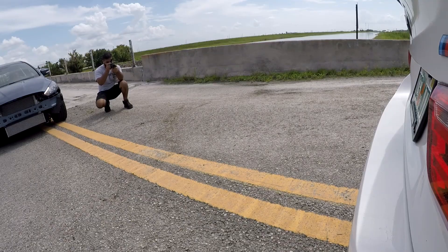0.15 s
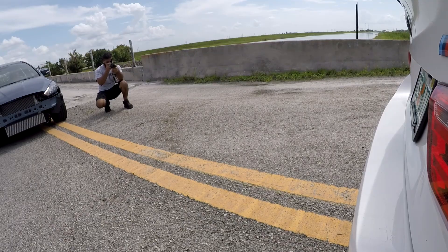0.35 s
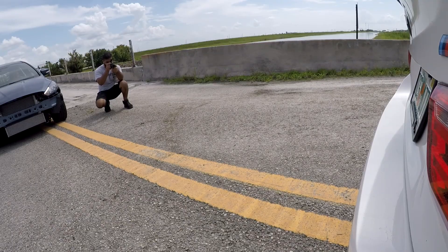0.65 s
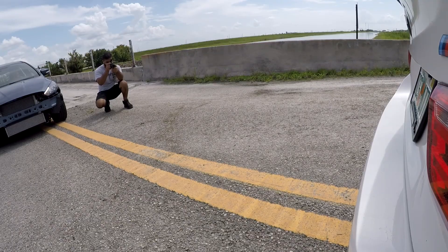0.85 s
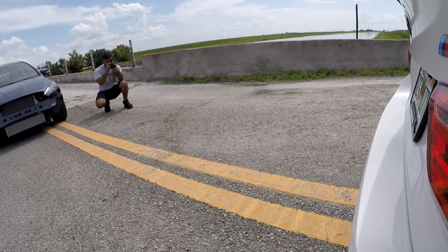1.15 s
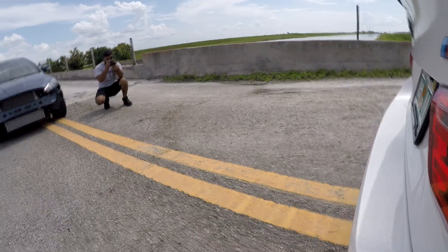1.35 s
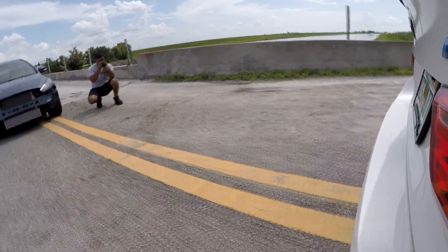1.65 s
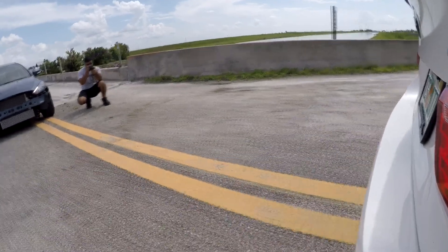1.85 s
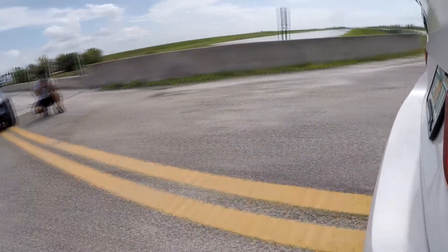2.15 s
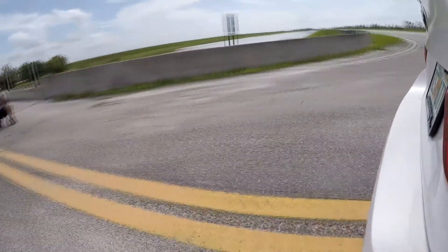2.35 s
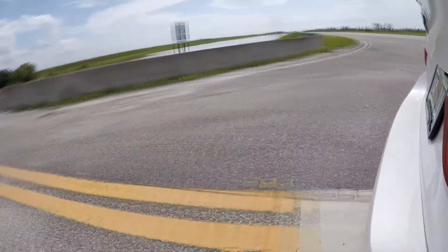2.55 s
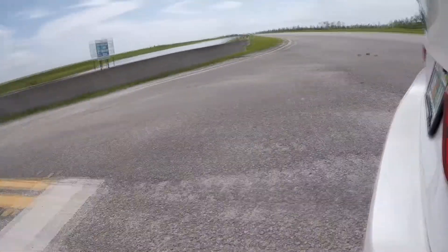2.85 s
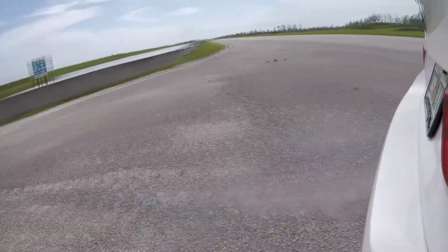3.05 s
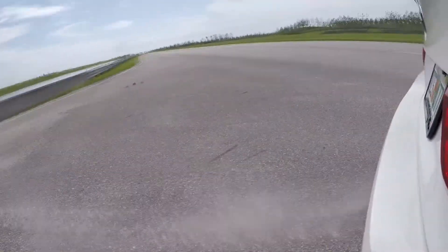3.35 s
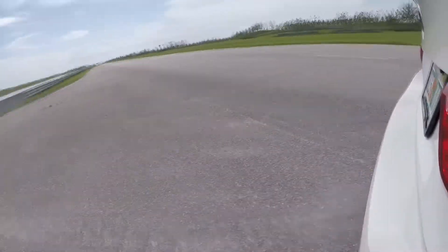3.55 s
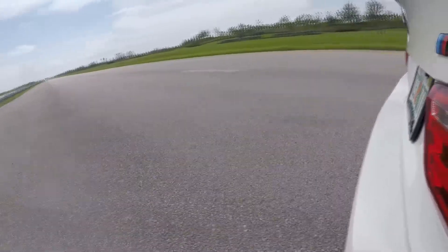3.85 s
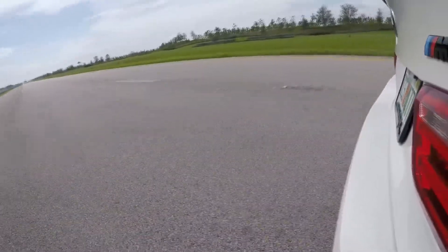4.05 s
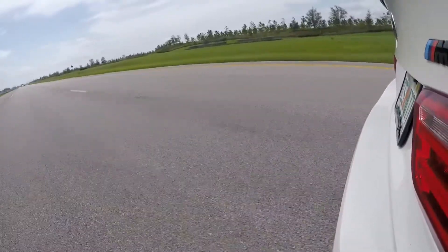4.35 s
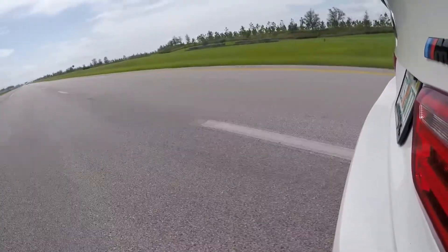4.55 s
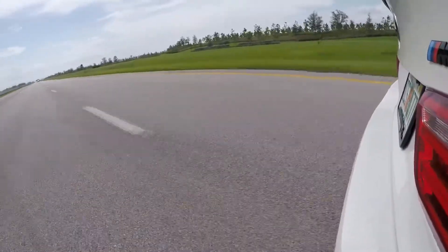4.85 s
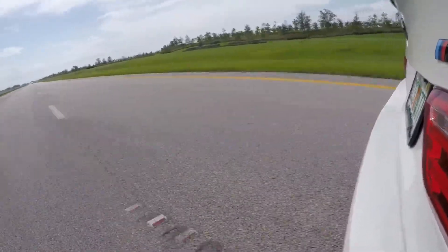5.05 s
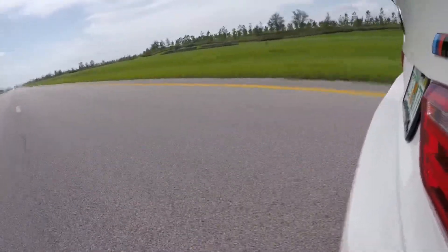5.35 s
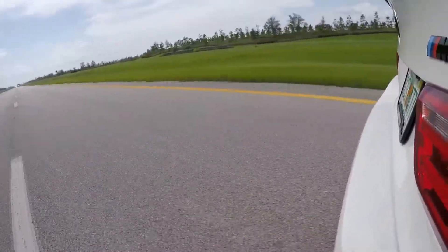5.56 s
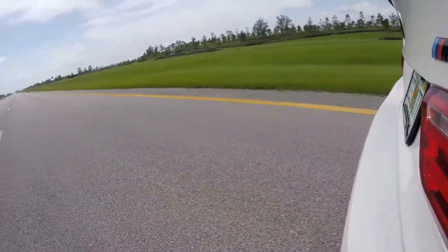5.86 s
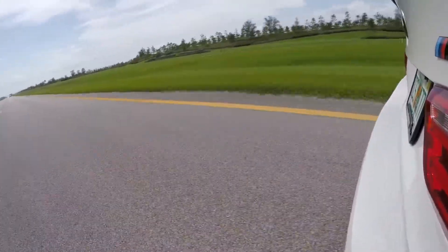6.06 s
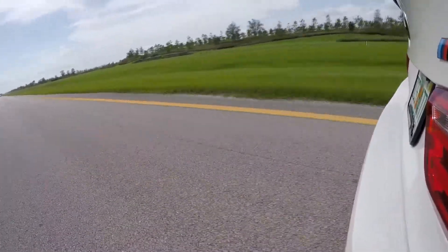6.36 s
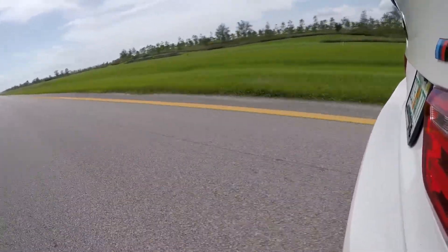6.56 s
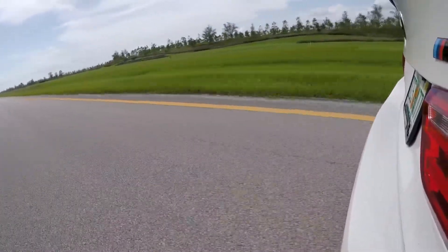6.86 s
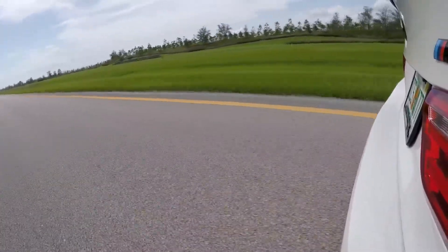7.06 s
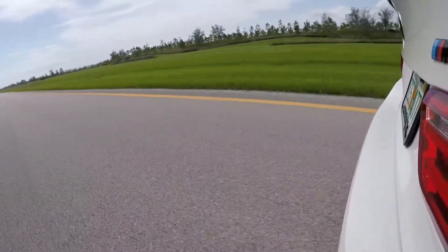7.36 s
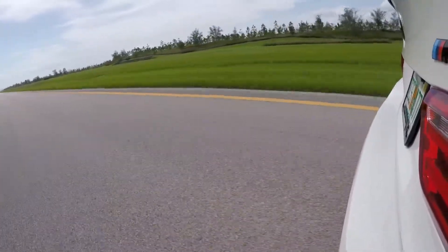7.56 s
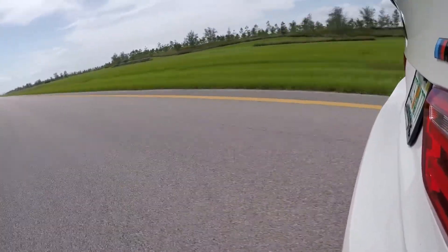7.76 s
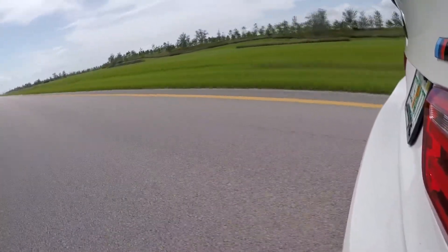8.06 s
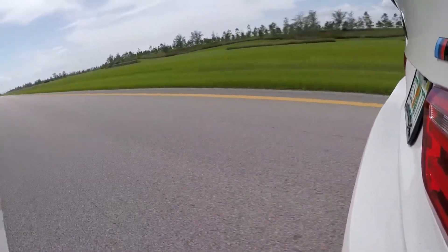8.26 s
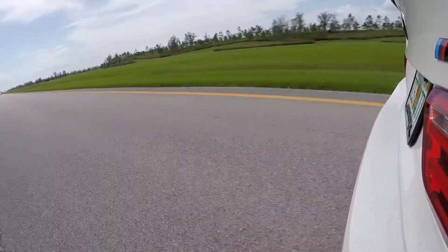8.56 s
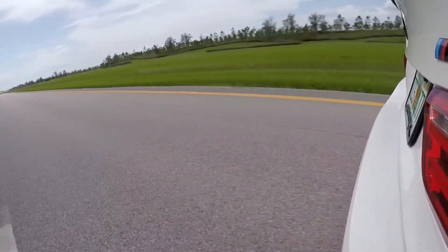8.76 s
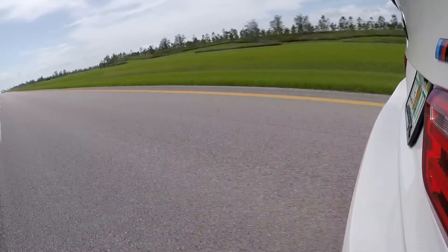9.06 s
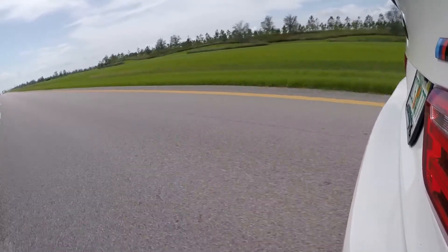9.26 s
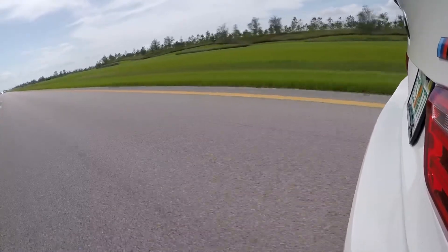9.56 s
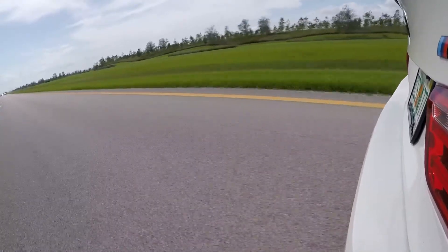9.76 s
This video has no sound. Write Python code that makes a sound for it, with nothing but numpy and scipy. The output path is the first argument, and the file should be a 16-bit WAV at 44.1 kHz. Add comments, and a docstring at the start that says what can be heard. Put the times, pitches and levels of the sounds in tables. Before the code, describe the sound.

Heard close at the tailpipes, an idling six-cylinder car revs up, rasps against its limiter, shifts with a bang and accelerates away amid crackles and wind.

```python
"""A turbocharged six-cylinder sports car, heard from its rear bumper just above the tailpipes.
Its idle is a putter of two pipe banks; from 1.2 s the revs rise, adding firing harmonics, rasp and gas hiss.
It launches against a limiter that cuts cylinders, then shifts with a bang: a noise burst with a sharp front.
It pulls away twice more; lifting brings pops, and after these two pulls faint wavering turbo whistles.
Under it all lies filtered noise for wind and tyres, stronger by the end."""
import sys
import numpy as np
from scipy import signal
from scipy.fft import rfft, irfft, next_fast_len
from scipy.io import wavfile
from scipy.ndimage import uniform_filter1d, minimum_filter1d

SR = 44100
rng = np.random.default_rng(int(sys.argv[2]) if len(sys.argv) > 2 else 0)


def bounce(signal):
    """Save signal as a 16-bit WAV file at the path given by the first command-line argument."""
    frames = np.transpose(np.atleast_2d(signal))
    limited = np.clip(frames, -1, 1)
    pcm = np.round(limited * 32767).astype(np.int16)
    wavfile.write(sys.argv[1], SR, pcm)


N = 437472

# Airstream at the microphone. Each row: time in seconds, level in dB.
WIND_LEVEL = [(0,-31),(1.2,-30),(1.5,-27),(2.2,-30),(5,-27.5),(5.8,-22),(6.2,-23.5),(6.6,-16.5),(7.2,-17),(7.7,-15.5),(8.8,-12),(9.5,-12.5),(9.92,-11)]
# Low buffeting spectrum. Each row: frequency in Hz, relative density in dB per Hz.
BUFFET_SPECTRUM = [(15, -56), (25, -11.5), (59, -1), (118, -2), (184, -3), (308, -10), (515, -20.5),
                   (576, -24), (653, -27.5), (700, -20.5), (910, -50.5), (1540, -120)]
# Tyres on asphalt. Each row: frequency in Hz, relative density in dB per Hz.
TYRE_SPECTRUM = [(500,-5),(950,3),(1500,-3),(2500,-12),(3500,-27.5),(6000,-59)]

# Turbo whistles as the throttle shuts. Each row: start in seconds, length in seconds, mid pitch in Hz,
# rate of random wavering in Hz, level in dB.
WHISTLES = [(7.61,0.086,6280,100,-47),(7.6,0.16,4770,160,-48),(7.69,.14,4100,90,-47),(7.6,0.2,4130,250,-49),(7.62,.2,2100,140,-40),(9.574,0.091,4450,200,-48),(9.571,0.034,6700,160,-48),(9.58,0.2,2900,1000,-44)]
WHISTLE_SAG_PER_S = 0.098   # share of the mid pitch lost per second
# Intake gulps as the throttle opens. Each row: centre in seconds, width in seconds, level in dB.
INTAKE_GULPS = [(1.72,0.97,-42.5),(6.424,0.25,-53),(8.5,0.21,-53)]
# Intake resonances, passed twice. Each row: frequency in Hz at full heat, width in Hz and level in dB per pass.
INTAKE_MODES = [(4284,670,3),(4570,360,9),(5820,1300,2.5)]
INTAKE_SAG = 0.24   # share of their pitch lost at zero heat
SPOOL_S, SPOOL_DB = 0.58, 18.5   # spooling time constant, and loss per unit of load not yet followed

SHUDDER_DB, SHUDDER_S = -19.5, 0.49   # the engine shudders as it leaves idle
SHUDDER_SWELL_DB = 0.5   # its note then rises briefly
# Small cracks in the pipe, leaving idle and off the throttle. Each row: time in seconds, level in dB.
KNOCKS = [(1.256,-24),(1.284,-29),(1.304,-36),(7.788,-25),(7.901,-30),(8.014,-35),(8.101,-35.5),(8.194,-37),(8.246,-36),(9.595,-28),(9.634,-36),(9.785,-31)]
# What they ring. Each row: frequency in Hz, width in Hz, relative level in dB.
KNOCK_MODES = [(1150,180,-1),(1750,360,0),(2140,230,-3),(2770,420,-9)]
KNOCK_DECAY_S = 0.0051
# Fuel exploding in the pipe. Each row: start in seconds, level in dB before colouring, decay in seconds.
POPS = [(1.207,-16,0.042),(2.352,-8.5,0.0075),(2.654,-5.5,0.0055),(2.85,-11.5,0.0071),(2.907,-14,0.0012),(3.034,-4.5,0.011),(3.292,-3,0.0075),(3.413,-8,0.0036),(3.475,-8.5,0.0059),(5.851,-16,0.016),(5.961,-0.5,0.0089),(6.165,-17.5,0.014),(7.552,-2,0.013),(7.82,-14.5,0.0048),(7.931,-17,0.013),(8.016,-21.5,0.002),(9.543,-5,0.008),(9.727,-12.5,0.0018)]
# Each row: frequency in Hz, gain in dB.
POP_SPECTRUM = [(40,-16),(150,11.5),(300,2.5),(520,-1.5),(1000,9.5),(1600,-10.5),(3000,-16),(6000,-20),(9000,-26),(15000,-59)]

# Pipe of the first bank of three cylinders at idle. Each row: frequency in Hz, width in Hz, level in dB.
FIRST_BANK = [(446,26,26),(676,81,27),(893,22.5,32),(846,93,22.5),(1000,167,17)]
# Pipe of the second bank. Each row: frequency in Hz, width in Hz, level in dB.
SECOND_BANK = [(420,12,16.5),(661,29,25.6),(706,184,20.9),(1010,78.4,32.63),(1013,46,34.3)]
SILENCER_ECHO_S, SILENCER_ECHO_SHARE = 0.00661, -0.39   # the pulse returns inverted from the silencer
TICK_DB, TICK_DECAY_S, TICK_WASH = -36, 0.0081, 0.18   # each firing spits a tick of gas over a faint wash
IDLE_LOPE_DB = -26.5   # the two banks differ, which puts weak lines between the firing harmonics

IDLE_HZ, FIRST_FIRING_S, REV_START_S = 49.65, .016, 1.2   # idle speed in firings per second
REV_HZ_PER_S, REV_GROWTH_HZ_PER_S2 = 88, 49   # the rev-up quickens
COAST_HZ_PER_S = 42   # added fall after the last driven row
HUNT_HZ = .5   # random wander of the speed at full cut
# Speed on the limiter. Each row: time in seconds, speed in firings per second.
LAUNCH_SPEED = [(2.2, 185), (2.27, 191), (2.45, 188), (2.62, 185.3), (2.82, 190.5), (3.01, 191.9),
                (3.11, 180), (3.14, 179.5), (3.21, 189), (3.3, 186.5), (3.42, 189), (3.56, 187),
                (3.66, 190.3), (3.9, 186), (4.2, 188.2), (4.4, 186.2), (4.72, 187.6), (4.87, 185.6),
                (5.05, 188.3), (5.3, 190.8), (5.47, 187), (5.57, 190.5), (5.66, 182), (5.75, 180),
                (5.93, 176)]
# Speed in each of the two gears. Each row: time in seconds, speed in firings per second.
GEAR_SPEEDS = [
    [(6.28, 163), (6.37, 150), (6.42, 138), (6.518, 116), (6.6, 110.8), (6.72, 114), (6.82, 120.3),
     (6.912, 128.6), (7.09, 141.3), (7.3, 152.6), (7.39, 153.7), (7.42, 150.7), (7.486, 137.7), (7.55, 145)],
    [(8.3, 94), (8.6, 98.3), (9.29, 113), (9.39, 114), (9.44, 108.5), (9.48, 108.5), (9.52, 114)],
]
# Throttle pulls. Each row: opening in seconds, rise in seconds, lift in seconds, fall in seconds, then the
# levels of deep note, rasp, jet hiss, sizzle and turbo in dB.
PULLS = [(1.511, 0.33, 5.606, 0.26, 3, -14.5, -26, -44, -44),
         (6.212, 0.22, 7.503, 0.19, -0.5, -16, -32, -52, -35),
         (8.24, 0.31, 9.54, 0.026, -2, -20, -38, -65.5, -47)]
# The five layers just off idle: deep note, rasp, jet hiss, sizzle and turbo in dB.
OFF_IDLE_DB = (-1, -23.5, -37, -55, -88)
# The five layers with the throttle shut: deep note, rasp, jet hiss, sizzle and turbo in dB.
OVERRUN_DB = (-23, -35, -64.5, -95, -77)
# Exponents by which the five layers follow the flow: deep note, rasp, jet hiss, sizzle and turbo.
FLOW_POWERS = (1.15, 0.54, 0.39, 1.2, 3)
LINGER_SHARE, LINGER_S = 0.67, 0.23   # part of the gas flow outlasts a lift, and its decay
HEATING_S, COOLING_S, FULL_HEAT = 0.12, 0.55, 0.9   # the gas heats under load and cools off the throttle
IDLE_TURBULENCE, LOAD_TURBULENCE, OVERRUN_TURBULENCE = 0.4, 0.55, .8
CATCH_S, CATCH_WIDTH_S, CATCH_TURBULENCE = 1.55, .7, .35   # the burn is ragged while the engine catches

# The limiter's cuts. Each row: start in seconds, length in seconds, depth from 0 to 1.
CUTS = [(2.295, 0.13, 0.47), (2.783, 0.26, 0.43), (3.479, 2.2, 0.94)]
CUT_RAMP_S = 0.15
# Ignition dropouts. Each row: centre in seconds, width in seconds.
MISFIRES = [(2.345,0.0072),(2.847,0.012),(2.926,0.0059),(3.028,0.008),(3.274,0.072),(3.414,0.011),(3.473,0.022)]
# Stretches of even burning in which one harmonic sings. Each row: start in seconds, length in seconds,
# multiple of the firing rate, level over the rasp in dB.
STEADY_BURNS = [(1.928,.29,5,-2),(2.457,0.12,5.3,-7),(3.061,0.15,5,-7.5),(3.59,0.16,6.1,-2.5),(4.161,0.18,6.1,-3),(4.434,0.096,4.6,-4.5),(4.821,0.21,4.6,-5.5),(5.174,0.21,6.1,-3.5),(5.413,.14,5.1,-5),(5.682,0.15,4.3,-1.5),(6.292,0.17,6.2,-7),(6.503,0.37,9,-5.5),(6.838,0.69,7.1,-3.5),(8.51,0.91,9.1,-4.5)]
LOCK_S, SINGING_WIDTH_HZ, SINGING_DUCK_DB = 0.078, 130, -3.5   # lock-in time; the rest of the rasp recedes
LIMITER_CALM, GEAR_CALM = .94, .72   # how far a steady burn evens out the firing, at full cut and in gear
# Exhaust flaring into crackle. Each row: centre in seconds, width in seconds, sizzle gain in dB.
FLARES = [(2.43, 0.19, 10.5), (2.89, 0.21, 11), (3.695, 0.18, 8), (5.16,0.28,4), (5.542, 0.44, 5.5),
          (6.688, 0.13, 12.5), (7.5, 0.13, 11.5), (9.468, 0.13, 18)]
FLARE_HISS_SHARE, FLARE_RASP_SHARE = 0.46, 0.23   # of that gain in dB
THROB_S, THROB_WIDTH_S, THROB_DB = 9.14, 0.62, 3   # in the last gear the gas throbs once a crank turn
CUT_RASP_DB = -0.7   # the rasp thins at full cut

# The six cylinders in firing order. Each row: strength in dB before the cut-dependent weight in firings(),
# lateness in firing intervals without a cut.
CYLINDERS = [(3,0.012),(2.5,0.00048),(4.5,0.0062),(1,0.013),(3.5,0.0037),(3,0.027)]
# The three firings of a crank turn at full cut. Each row: strength in dB, mean lateness in firing intervals.
CUT_PATTERN = [(4.5,0.0098),(2.5,0.4606),(-26.5,0.18)]
# Jet noise of hot gas. Each row: frequency in Hz, relative density in dB per Hz.
HOT_JET = [(1200,-2.5),(1800,4.5),(2150,-8.5),(2500,1.5),(3000,-6.5),(4500,-4.5),(5300,-9),(5900,-9),(7500,-22)]
# Jet noise of cool gas. Each row: frequency in Hz, relative density in dB per Hz.
COOL_JET = [(1200,11.5),(1600,1),(2300,-5.5),(2850,-13.5),(3300,-6),(3950,-3.5),(4600,-18),(5500,-7),(6500,-10.5),(7800,-21)]
# Fine crackle. Each row: frequency in Hz, relative density in dB per Hz.
SIZZLE_SPECTRUM = [(5500,-25),(7000,-5),(8500,-8),(10000,-19),(11700,-35.5),(13300,-19.5),(15000,-30.5)]
# Exhaust resonances at full heat. Each row: frequency in Hz, width in Hz, relative level in dB.
HOT_PIPE = [(471,49,-0.5),(635,88,3.5),(835,73,8.5),(939,100,11),(1037,137,10),(1230,96,8),(1520,110,-5.5),(1756,250,-8.5)]
PIPE_COOL_SAG, PIPE_WANDER = 0.18, 0.016   # share of their pitch lost at zero heat, and random wander
# Pulses from the far ends of the pipe. Each row: delay in seconds, share of the pulse.
ECHOES = [(.00455, 0.098), (.00685, 0.089)]
# How the pipe carries a firing harmonic. Each row: frequency in Hz, gain in dB.
PIPE_TONE = [(50,-18.5),(75,-27.5),(112,-39.5),(135,-23),(150,-11),(165,-13),(188,-9.5),(208,-12.5),(235,-14.5),(275,-10.5),(298,-20.5),(325,-11.5),(358,-18),(378,-25.5),(500,-25),(750,-47)]
# Firing harmonics from the first up. Each row: gain at idle in dB, revving cold in dB, at full heat in dB,
# change at full cut in dB.
HARMONICS = [(0, 2.5, -0.5, -3), (1, -1, -0.5, -14.5), (-6, -17.5, 3, -10), (-0.5, -13, -6, -4.5),
             (-23, -16.5, -2.5, -10), (-12.5, -15.5, -12, -2), (-23.5, -21, -18, -2.5), (-6, -15, -8.5, -1)]
# Crank orders that swell with the cut. Each row: cycles per turn, relative level in dB.
CUT_ORDERS = [(1,-29),(2,-43),(4,-22),(5,-24.5),(7,-37.5),(8,-42),(10,-26.5),(13,-46.5),(16,-40.5),(17,-39),(19,-25.5)]
# Irregular low noise of a partial cut. Each row: frequency in Hz, relative density in dB per Hz.
STUMBLE_SPECTRUM = [(30,-16),(60,-4.5),(110,-15),(170,-8),(260,7),(420,6),(600,-46)]
FIRINGS_PER_TURN = len(CYLINDERS) / 2

# At idle the left channel differs from the right. Each row: frequency in Hz, left minus right in dB.
CHANNEL_DIFFERENCE = [(60, -5.5), (110, 2), (190, -9.5), (330, -8.5), (570, -2.5), (1000, -15.5),
                      (1760, -12), (3100, -9.5), (5450, 9.5), (9570, 4)]
RELEASE_DB_PER_S = 118   # recovery of the recorder's limiter
STOPBAND_HZ = 16500   # 70 dB down from here up


def from_db(db):
    """Decibels are twenty times the logarithm of an amplitude gain."""
    return 10 ** (np.asarray(db) / 20)


def seconds():
    """Sampling divides time evenly."""
    return np.arange(N) / SR


def in_time(rows):
    """Linear interpolation gives each column of a curve at every sample."""
    s, *columns = np.transpose(rows)
    return [np.interp(seconds(), s, c) for c in columns]


def steady(x):
    """Automatic gain: division by the running 81 ms rms evens the slow level to 1."""
    return x / np.sqrt(np.abs(uniform_filter1d(x * x, size=3572)) + 1e-14)


def noise():
    """White noise has equal power at all frequencies."""
    return rng.standard_normal(N)


def colour(x, spectrum):
    """Minimum phase: a folded cepstrum makes a causal filter with the given spectrum."""
    size = 2 * next_fast_len(N // 2 + 8192)
    hz, db = np.transpose(spectrum)
    grid = np.log(np.arange(size // 2 + 1) * SR / size + 1)
    # skirts fall 30 dB in the octave beyond each end
    edges_hz = [hz[0] / 2, *hz, hz[-1] * 2]
    edges_db = [db[0] - 30, *db, db[-1] - 30]
    gain_db = np.interp(grid, np.log(edges_hz), edges_db)
    cepstrum = irfft(np.log(from_db(gain_db)))
    cepstrum[1:size // 2] *= 2
    cepstrum[size // 2 + 1:] = 0
    return irfft(rfft(x, size) * np.exp(rfft(cepstrum)))[:N]


def drift(rate):
    """Band-limited randomness: joined random knots, rate per second, wander with spread 1."""
    knots = rng.standard_normal(int(N / SR * rate) + 2)
    return np.interp(seconds() * rate, np.arange(len(knots)), knots) / np.sqrt(2 / 3)


def resonate(x, modes):
    """Modal superposition: two-pole resonances add in parallel with alternating sign."""
    out = np.zeros(N)
    for k, (hz, width, db) in enumerate(modes):
        r = np.exp(-np.pi * width / SR)
        poles = [1, -2 * r * np.cos(2 * np.pi * hz / SR), r * r]
        gain = (-1) ** k * from_db(db) * (1 - r * r) / 2
        out += gain * signal.lfilter([1, 0, -1], poles, x)
    return out


def detuned(x, modes, stretch):
    """Time scaling: resonating on a slowed clock lowers all pitches by a factor from 0.5 to 1."""
    clock = np.cumsum(np.clip(stretch, .5, 1))
    rung = resonate(np.interp(np.arange(N), clock, x), modes)
    return np.interp(clock, np.arange(N), rung)


def die_away(clicks, decay):
    """Exponential decay: each click starts a loss at a constant relative rate."""
    return signal.lfilter([1], [1, -np.exp(-1 / (decay * SR))], clicks + 1e-18)


def lag(x, time_s):
    """First-order relaxation follows a signal with the given time constant."""
    keep = np.exp(-1 / (time_s * SR))
    return signal.lfilter([1 - keep], [1, -keep], x + 1e-18)


def swell(s, width):
    """A Gaussian of height 1 around a moment, width wide at 1/e."""
    return np.exp(-(2 * (seconds() - s) / width) ** 2)


def gate(s, length, ramp):
    """A trapezoid from 0 to 1 whose edges stand at half height at start and end."""
    t = seconds()
    return np.clip(np.minimum(t - s, s + length - t) / ramp + .5, 0, 1)


def wind(gust_db=1.44, tyres_db=-19):
    """Flow noise: low buffeting and tyre rush share one level, a curve over time that is stronger by the end."""
    level_db, = in_time(WIND_LEVEL)
    buffet = from_db(gust_db * drift(30)) * steady(colour(noise(), BUFFET_SPECTRUM))
    tyres = from_db(tyres_db) * steady(colour(noise(), TYRE_SPECTRUM))
    return from_db(level_db) * (buffet + tyres)


def whistles():
    """Narrow-band modulation: vented boost air whistles waveringly and sinks as the turbo slows."""
    out = np.zeros(N)
    for s, length, hz, waver_hz, db in WHISTLES:
        age = np.clip(seconds() - s, 0, length)
        turn = 2 * np.pi * np.cumsum(hz * (1 - WHISTLE_SAG_PER_S * (age - length / 2))) / SR
        tone = drift(waver_hz) * np.cos(turn) + drift(waver_hz) * np.sin(turn)
        out += from_db(db) * np.sin(np.pi * age / length) * tone
    return out


def turbo(full_db, load, heat):
    """Cavity resonance: intake air hisses, gulps as throttle opens, gains as spool follows, rises with heat."""
    gulps = sum(from_db(db) * swell(s, width) for s, width, db in INTAKE_GULPS)
    unspooled = np.maximum(load - lag(load, SPOOL_S), 0)
    boost = from_db(full_db - SPOOL_DB * unspooled)
    stretch = 1 - INTAKE_SAG * (1 - heat) ** 4
    air = detuned(detuned(noise(), INTAKE_MODES, stretch), INTAKE_MODES, stretch)
    return (gulps + boost) * from_db(1.5 * drift(25)) * steady(air)


def shudder():
    """Random vibration: a short low rumble as the engine picks up from idle."""
    return from_db(SHUDDER_DB) * swell(REV_START_S, SHUDDER_S) * steady(colour(noise(), BUFFET_SPECTRUM))


def knocks():
    """Modal ringing: brief gritty cracks sound the metal of the pipe."""
    s, db = np.transpose(KNOCKS)
    hits = np.zeros(N)
    hits[(s * SR).astype(int)] = from_db(db)
    return die_away(hits, KNOCK_DECAY_S) * steady(resonate(noise(), KNOCK_MODES))


def pops(front=5.4, steep_from_db=-6):
    """Wave steepening: each pop is a short roar, and a stronger one has a sharper front."""
    bursts = np.zeros(N)
    age = np.arange(4096) / SR
    for s, db, decay in POPS:
        burst = rng.standard_normal(len(age)) * np.exp(-age / decay)
        burst[0] += front
        edge_hz = np.clip(6000 * from_db(db - steep_from_db), 1500, 14000)
        burst = signal.sosfilt(signal.butter(1, edge_hz, fs=SR, output="sos"), burst)
        at = int(s * SR)
        bursts[at:at + len(age)] += from_db(db) * burst
    return from_db(5.5) * colour(bursts, POP_SPECTRUM)


def idle_lope(phase):
    """Subharmonics: the limp of the idle sounds halfway between the low firing harmonics."""
    lines = sum(np.sin(2 * np.pi * (k + .5) * phase + k * k) for k in range(2, 8))
    return from_db(IDLE_LOPE_DB) * lines / 2


def putter(phase, scatter_db=2.1):
    """Impulse excitation: two banks fire in turn, each knocking its own pipe with a crisp tick of gas."""
    number = np.floor(phase)
    clicks = np.diff(number, prepend=number[0]) * from_db(scatter_db * drift(54))
    second = number % 2
    pipes = resonate(clicks * (1 - second), FIRST_BANK) + resonate(clicks * second, SECOND_BANK)
    pipes = pipes + SILENCER_ECHO_SHARE * np.interp(seconds() - SILENCER_ECHO_S, seconds(), pipes)
    ticks = (die_away(clicks, TICK_DECAY_S) + TICK_WASH) * noise()
    return pipes + from_db(TICK_DB) * steady(colour(ticks, COOL_JET))


def limiter():
    """Speed limiting: the depth from 0 to 1 of the cylinder cut."""
    return np.clip(sum(depth * gate(s, length, CUT_RAMP_S) for s, length, depth in CUTS), 0, 1)


def engine_speed(cut):
    """Kinematics in firings per second: idle, rev-up, limiter and gears, then a final coast."""
    t = seconds()
    revving = np.maximum(t - REV_START_S, 0)
    rev_up = IDLE_HZ + REV_HZ_PER_S * revving + REV_GROWTH_HZ_PER_S2 * revving ** 2
    driven = np.vstack([LAUNCH_SPEED, *GEAR_SPEEDS])
    coast = COAST_HZ_PER_S * np.maximum(t - driven[-1, 0], 0)
    return np.minimum(rev_up, in_time(driven)[0]) - coast + HUNT_HZ * cut * drift(6)


def gas_flow():
    """Inertia of gas: the flow from 0 to 1 of each pull rises, holds, drops at the lift and lingers."""
    t, flows = seconds(), []
    for opens, rise, lifts, fall, *_ in PULLS:
        since = np.maximum(t - lifts, 0)
        prompt = (1 - LINGER_SHARE) * np.clip(1 - since / fall, 0, 1)
        release = prompt + LINGER_SHARE * np.exp(-since / LINGER_S)
        flows.append(np.clip((t - opens) / rise, 0, 1) * release)
    return flows


def with_flow(flows, idling, overrun, pulling, power=1):
    """Power law: a quantity moves with the flow from its shut-throttle value to that of each pull."""
    # the idle value gives way to the overrun value at the peak of the first flow
    first_full = np.argmax(flows[0])
    value = np.where(np.arange(N) < first_full, idling, overrun)
    for flow, full in zip(flows, pulling):
        value = value + flow ** power * (full - value)
    return value


def gas_heat(load):
    """Thermal relaxation: heat from 0 to 1 rises quickly under load and fades slowly."""
    cooling = np.exp(-seconds() / COOLING_S)
    held = np.maximum.accumulate(load / cooling) * cooling
    return np.clip(FULL_HEAT * lag(held, HEATING_S), 0, 1)


def ignition(depth_db):
    """Interrupted excitation: the exhaust gain sinks while the spark is out."""
    out = sum(np.exp(-(2 * (seconds() - s) / width) ** 4) for s, width in MISFIRES)
    return from_db(depth_db * out)


def burble(turbulent, depth_db=4.0):
    """Amplitude modulation: the more turbulent the exhaust, the more uneven its gulps."""
    return from_db(turbulent ** 2 * depth_db * (drift(45) - 1.52))


def firings(phase, cut, calm, scatter_db, jitter_s, hunting):
    """Pulse train: one click per firing; the limiter weakens some cylinders and fires others late."""
    number = np.arange(2, int(phase[-1]) - 1)
    late_chance, strength_chance = rng.standard_normal((2, len(number)))
    own_db, own_late = np.array(CYLINDERS)[number % len(CYLINDERS)].T
    cut_db, cut_late = np.array(CUT_PATTERN)[number % len(CUT_PATTERN)].T
    depth, loose = [np.interp(number, phase, control) for control in (cut, 1 - calm)]
    cut_late = cut_late * (1 + hunting * loose * np.interp(number, phase, drift(13)))
    moment = number + own_late * (1 - depth) + cut_late * depth
    at = np.interp(moment, phase, np.arange(N)) + jitter_s * SR * loose * late_chance
    strength_db = 2 * own_db * (1.5 - depth) + cut_db * depth
    strength_db = strength_db + scatter_db * loose * (2.0 + depth) * strength_chance
    clicks = np.zeros(N)
    clicks[np.clip(at.astype(int), 0, N - 1)] = from_db(strength_db)
    return clicks


def jet(clicks, turbulent, calm, blast, decay, shock, wash, crackle_db):
    """Jet noise: gas spurts hiss over a wash, with shocks at high revs, more even in a steady burn."""
    shocks = steady(clicks * from_db(crackle_db * (2.5 - calm) * drift(150)))
    hiss = (steady(die_away(clicks, decay)) * (1 - turbulent) + wash) * noise()
    return hiss * (1 - calm) + shock * blast * (1 - turbulent) * shocks


def rasp(clicks, turbulent, heat):
    """Pipe resonance: pulses and the turbulent puffs behind them ring the pipe, higher in hot gas."""
    turbulent = turbulent * np.interp(heat, [0, .4], [.35, .85])
    puffs = (steady(die_away(clicks, decay=0.018)) + 0.86 * turbulent) * noise()
    drive = np.sqrt(1 - turbulent ** 2) * steady(clicks) + turbulent * steady(puffs)
    drive = drive + sum(share * np.interp(seconds() - delay, seconds(), drive) for delay, share in ECHOES)
    stretch = 1 - PIPE_COOL_SAG * (1 - heat) + PIPE_WANDER * drift(8)
    pipe = steady(detuned(drive, HOT_PIPE, stretch))
    return signal.sosfilt(signal.butter(2, [260, 2300], "band", fs=SR, output="sos"), pipe)


def steady_burns():
    """Phase locking: a gate from 0 to 1 for each stretch of even burning."""
    return [gate(s, length, LOCK_S) for s, length, *_ in STEADY_BURNS]


def sing(pipe, burns, firing_hz):
    """Tracking resonance: in a steady burn one harmonic is lifted out of the rasp."""
    _, _, multiple, db = np.array(STEADY_BURNS)[np.argmax(burns, axis=0)].T
    locked = np.max(burns, axis=0)
    # shift the harmonic to zero frequency, smooth it and shift it back
    carrier = np.exp(2j * np.pi * np.cumsum(multiple * firing_hz) / SR)
    narrow = lag(pipe / carrier, 1 / (np.pi * SINGING_WIDTH_HZ))
    singing = steady(np.real(narrow * carrier))
    return pipe * from_db(SINGING_DUCK_DB * locked) + locked * from_db(db) * singing


def harmonic_levels(firing_hz, heat, cut, idle):
    """Formant filtering: each firing harmonic, in dB, swells and fades as it sweeps the pipe's resonances."""
    swell_db = SHUDDER_SWELL_DB * swell(REV_START_S + SHUDDER_S / 2, SHUDDER_S / 2)
    hz, db = np.transpose(PIPE_TONE)
    levels = []
    for k, (idle_db, cold_db, hot_db, cut_db) in enumerate(HARMONICS, 1):
        carried_db = np.interp(np.log(k * firing_hz), np.log(hz), db)
        revving_db = cold_db + heat * (hot_db - cold_db)
        levels.append(carried_db + swell_db + idle * idle_db + (1 - idle) * revving_db + cut * cut_db)
    return levels


def boom(phase, harmonic_db, cut, calm, waver_db=3.0, stumble_db=-23):
    """Fourier synthesis: firing harmonics, plus crank orders and stumbling when cylinders are cut."""
    waver = waver_db * (1 - .9 * calm)
    note = sum(from_db(db + waver * drift(40)) * -np.sin(2 * np.pi * k * phase)
               for k, db in enumerate(harmonic_db, 1))
    turns = phase / FIRINGS_PER_TURN
    lope = sum(from_db(db + waver * drift(25)) * np.cos(2 * np.pi * round(order) * turns)
               for order, db in CUT_ORDERS)
    # strongest at half depth, none at full cut
    partial_cut = 2 * np.sqrt(cut * (1 - cut))
    stumble = from_db(stumble_db) * partial_cut * steady(colour(noise(), STUMBLE_SPECTRUM))
    return np.sqrt(2) * (note + cut * (0.73 + 0.29 * calm) * lope) + stumble


def stereo(x, narrow_from=1.13, narrow_to=2.06):
    """Level difference: at first the channels differ by frequency, left mostly quieter; a fade narrows to mono."""
    apart = np.interp(seconds(), [narrow_from, narrow_to], [1, 0])
    hz, db = np.transpose(CHANNEL_DIFFERENCE)
    ratio = from_db(np.interp(np.log(np.fft.rfftfreq(N, 1 / SR) + 1), np.log(hz), db))
    side = irfft(rfft(x) * (ratio - 1) / (ratio + 1), N)
    return x + apart * side * np.array([[1], [-1]])


def scene(leave_idle_s=0.14):
    """Superposition: engine speed, throttle and limiter drive the exhaust, added to the other sources."""
    flows, cut, burns = gas_flow(), limiter(), steady_burns()
    idle = np.clip(1 - (seconds() - REV_START_S) / leave_idle_s, 0, 1)
    calm = (GEAR_CALM + cut * (LIMITER_CALM - GEAR_CALM)) * np.clip(sum(burns), 0, 1)
    firing_hz = engine_speed(cut)
    load = np.max(flows, axis=0)
    heat = gas_heat(load)

    pulling_db = np.transpose(PULLS)[-len(OFF_IDLE_DB):]
    layers = zip(OFF_IDLE_DB, OVERRUN_DB, pulling_db, FLOW_POWERS)
    note_db, rasp_db, hiss_db, sizzle_db, turbo_db = [with_flow(flows, *layer) for layer in layers]
    loaded = [LOAD_TURBULENCE] * len(flows)
    turbulent = np.clip(with_flow(flows, IDLE_TURBULENCE, OVERRUN_TURBULENCE, loaded), 0, 1)
    turbulent = turbulent + CATCH_TURBULENCE * swell(CATCH_S, CATCH_WIDTH_S)
    flare_db = sum(db * swell(s, width) for s, width, db in FLARES)

    # phase counts firings
    phase = 2 - IDLE_HZ * FIRST_FIRING_S + np.cumsum(firing_hz * (1 + .001 * drift(30))) / SR
    clicks = firings(phase, cut, calm, scatter_db=1.5, jitter_s=.00003, hunting=.16)
    blast = np.interp(firing_hz, [130, 185], [.25, 1])
    crank = np.cos(2 * np.pi * phase / FIRINGS_PER_TURN)
    throb = from_db(THROB_DB * swell(THROB_S, THROB_WIDTH_S) * crank)

    harmonic_db = harmonic_levels(firing_hz, heat, cut, idle)
    note = from_db(note_db) * boom(phase, harmonic_db, cut, np.maximum(calm, idle))
    pipe = sing(rasp(clicks, turbulent * (1 - calm), heat), burns, firing_hz)
    pipe = from_db(rasp_db + CUT_RASP_DB * cut + FLARE_RASP_SHARE * flare_db) * pipe
    gas = jet(clicks, turbulent, calm, blast, decay=0.0042, shock=0.2, wash=0.65, crackle_db=2.5)
    hiss = heat * steady(colour(gas, HOT_JET)) + (1 - heat) * steady(colour(gas, COOL_JET))
    hiss = from_db(hiss_db + FLARE_HISS_SHARE * flare_db) * hiss
    fine_gas = jet(clicks, turbulent, calm / 2, blast, decay=.0055, shock=1.4, wash=.17, crackle_db=7.5)
    sizzle = from_db(sizzle_db + flare_db) * steady(colour(fine_gas, SIZZLE_SPECTRUM))

    rough = (1 - idle) * (pipe + hiss + sizzle) * throb * burble(turbulent)
    exhaust = note * ignition(depth_db=-16.0) + rough * ignition(depth_db=-11.5)
    idling = idle * (putter(phase) + idle_lope(phase))
    air = turbo(turbo_db, load, heat) + whistles() + wind()
    return stereo(exhaust + idling + shudder() + knocks() + pops() + air)


def record(dry, ceiling=0.86):
    """Peak limiting: a fast limiter holds the peaks under full scale, and a low-pass cuts the top."""
    over_db = 20 * np.log10(np.maximum(np.abs(dry).max(axis=0) / ceiling, 1))
    ramp = RELEASE_DB_PER_S * seconds()
    held_db = np.maximum.accumulate(over_db + ramp) - ramp
    gain_db = uniform_filter1d(minimum_filter1d(-held_db, size=45), size=45)
    limited = dry * from_db(gain_db)
    return signal.sosfilt(signal.cheby2(12, 70, STOPBAND_HZ, fs=SR, output="sos"), limited)


dry = scene()
out = record(dry)
bounce(out)
```